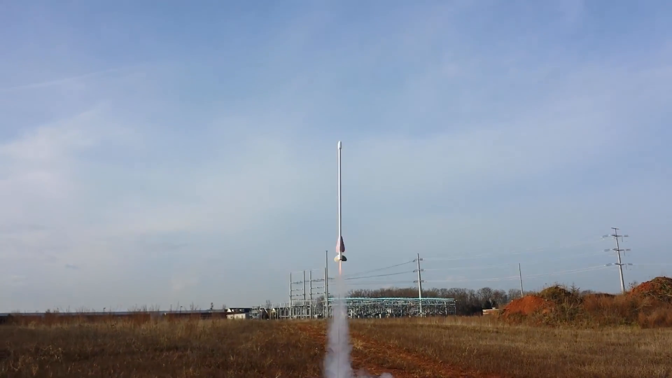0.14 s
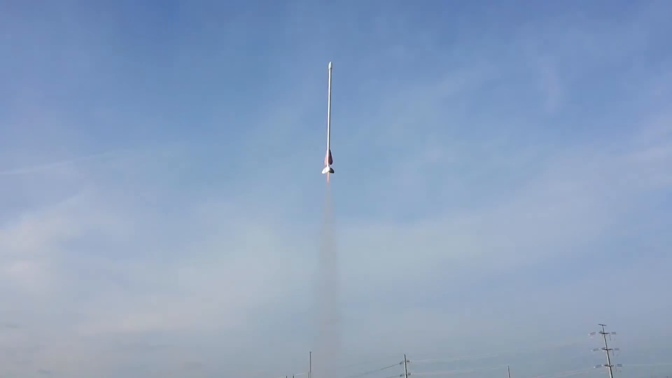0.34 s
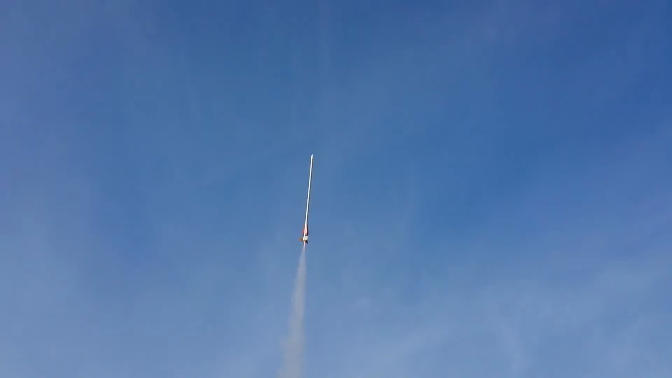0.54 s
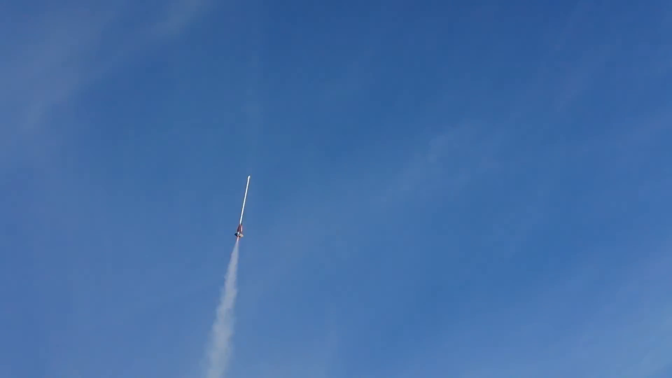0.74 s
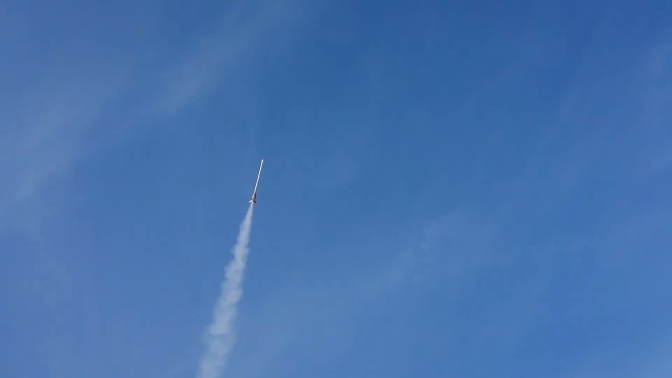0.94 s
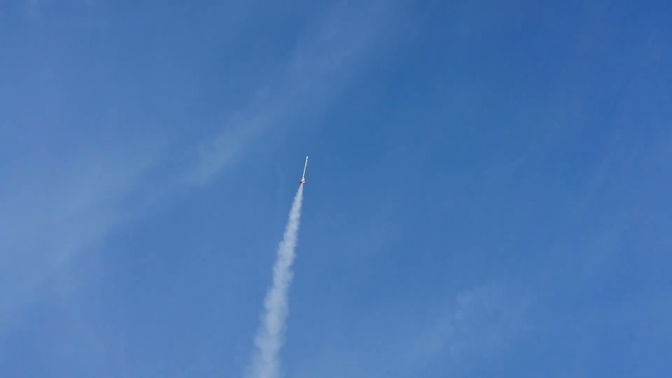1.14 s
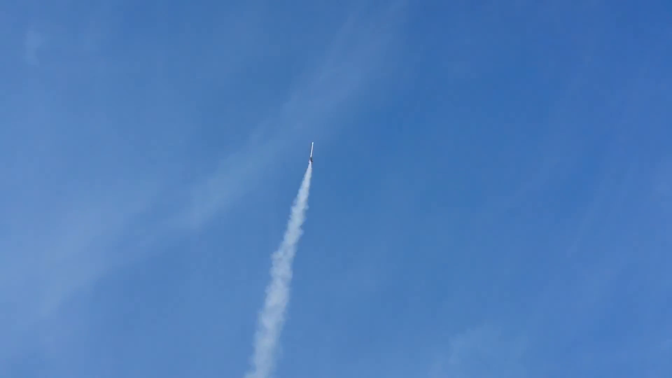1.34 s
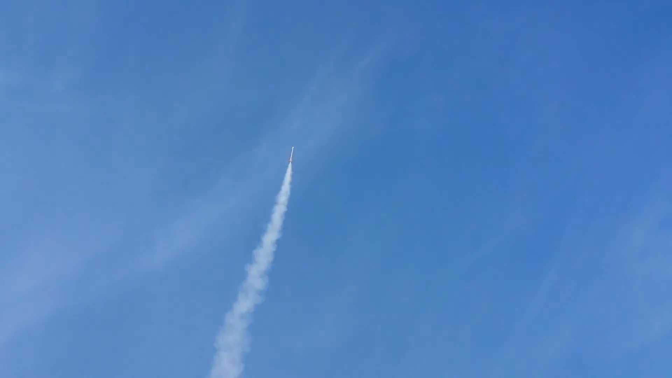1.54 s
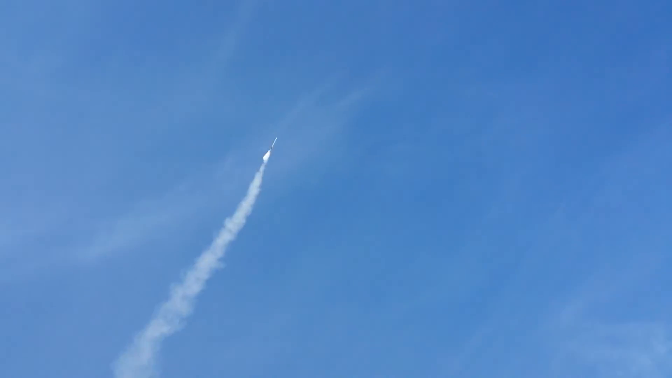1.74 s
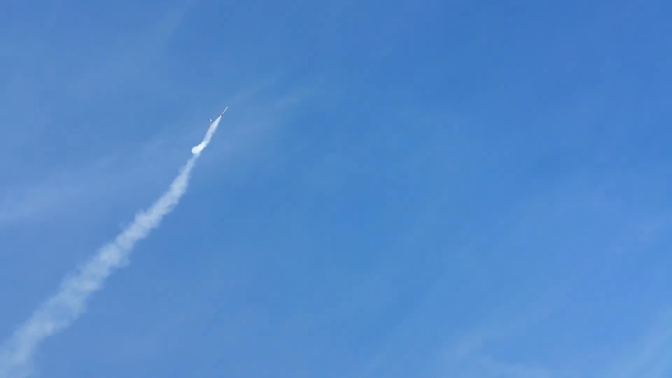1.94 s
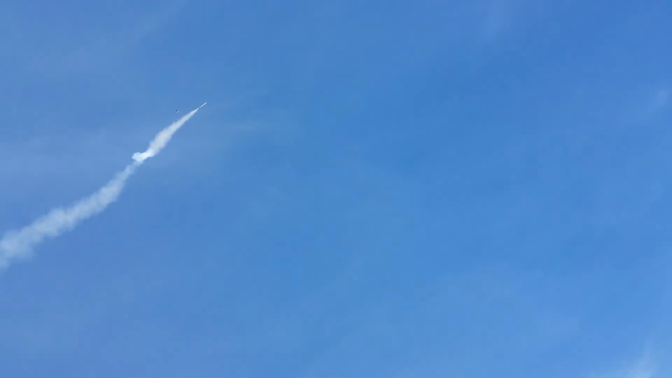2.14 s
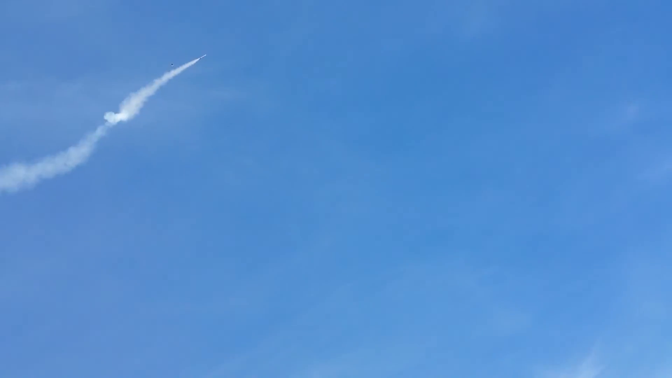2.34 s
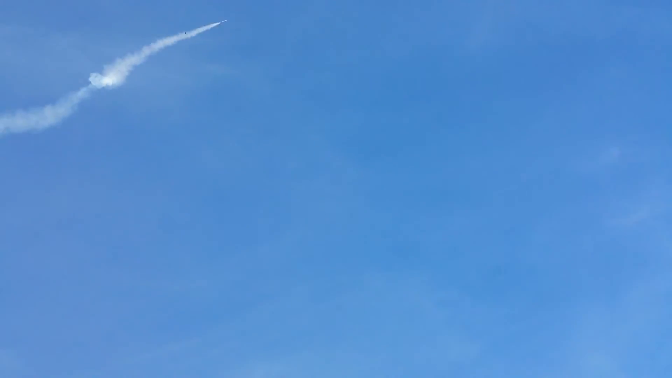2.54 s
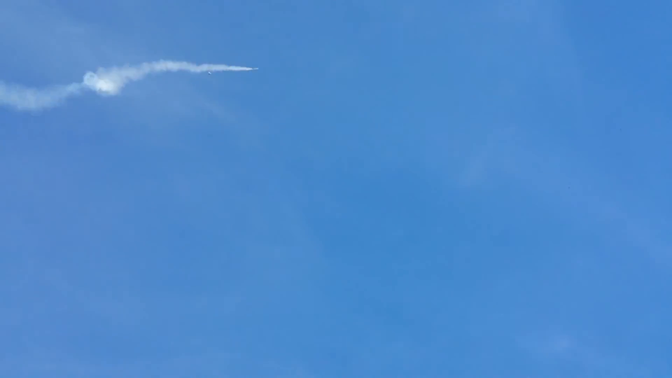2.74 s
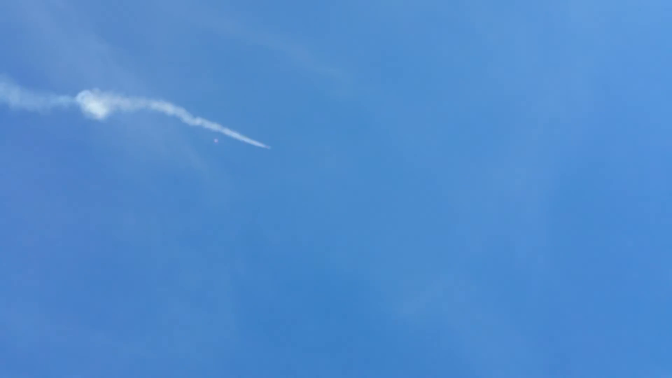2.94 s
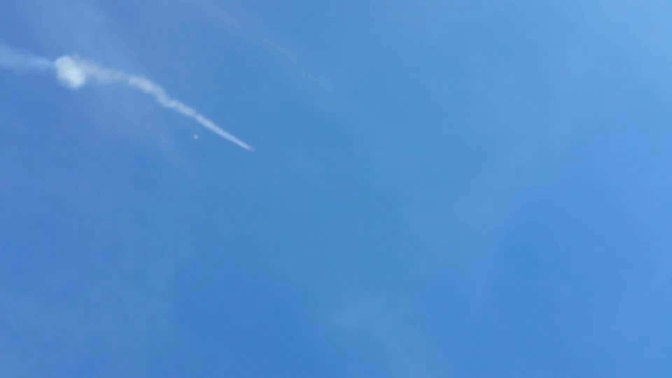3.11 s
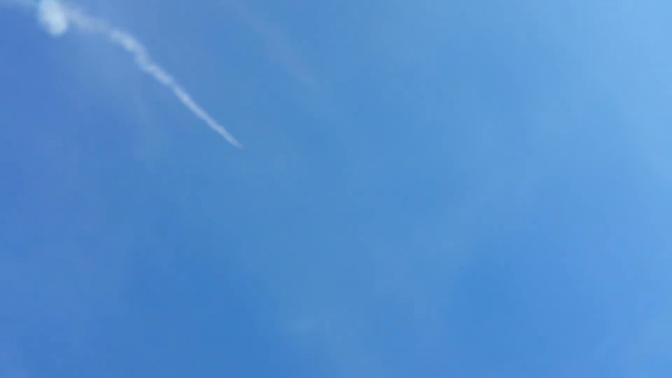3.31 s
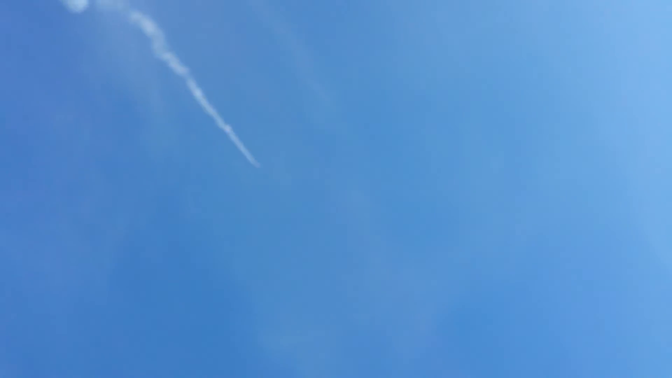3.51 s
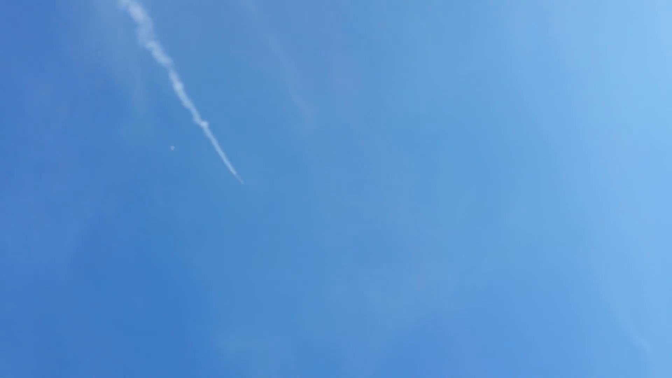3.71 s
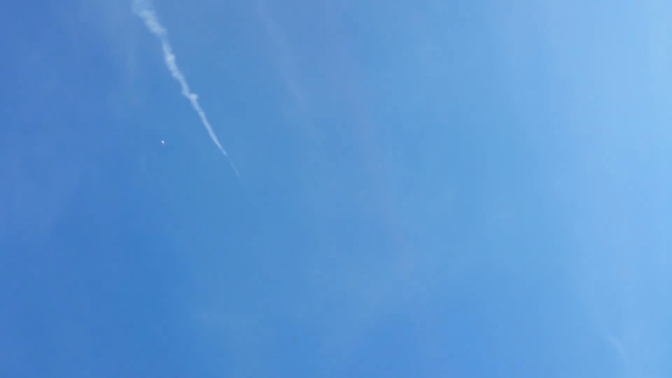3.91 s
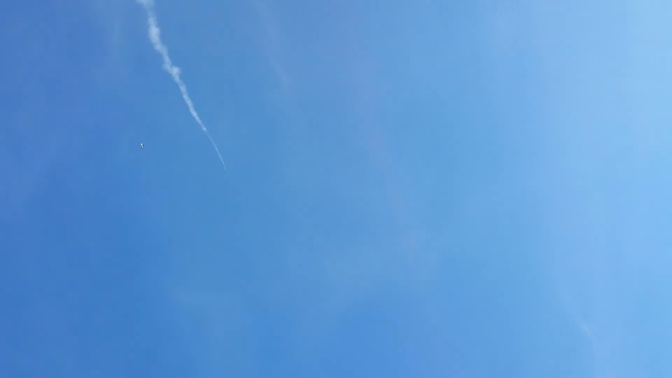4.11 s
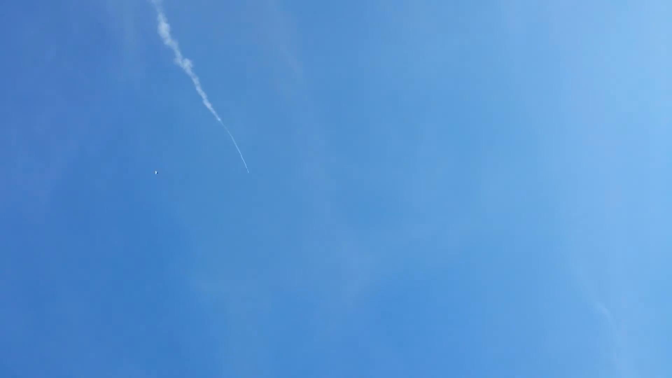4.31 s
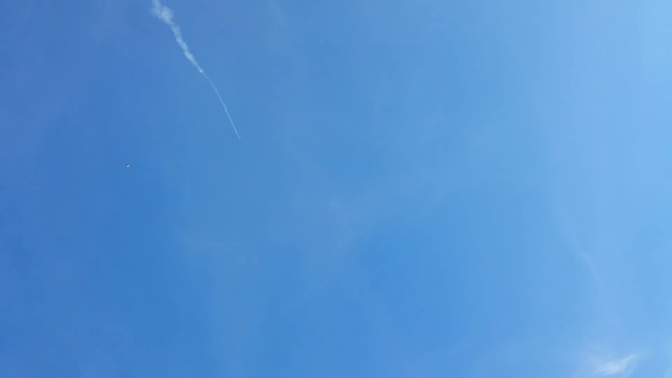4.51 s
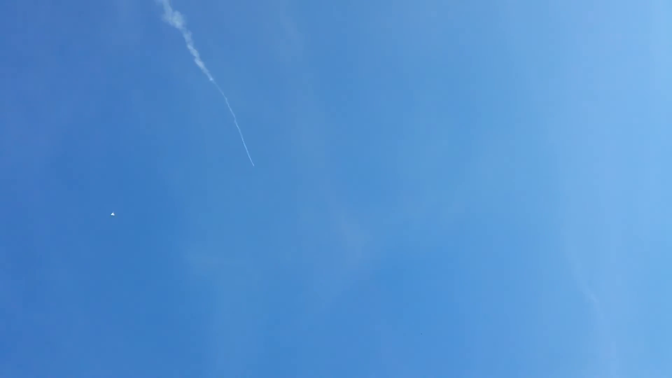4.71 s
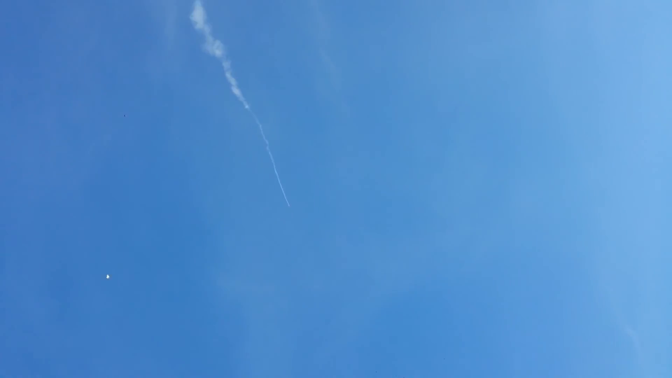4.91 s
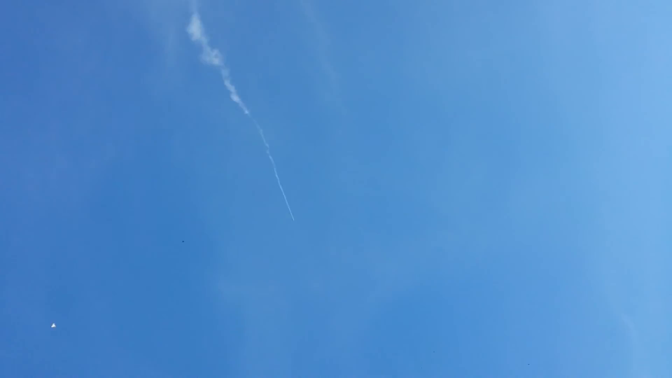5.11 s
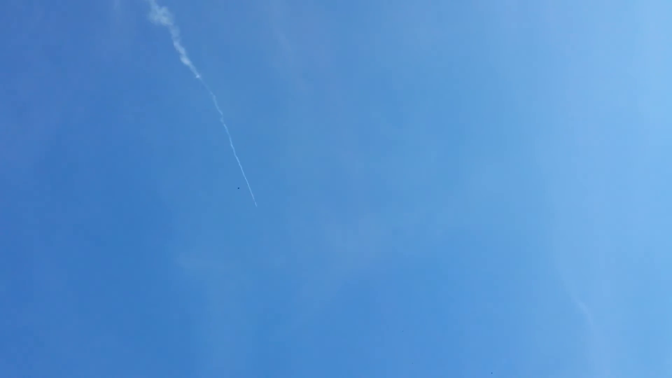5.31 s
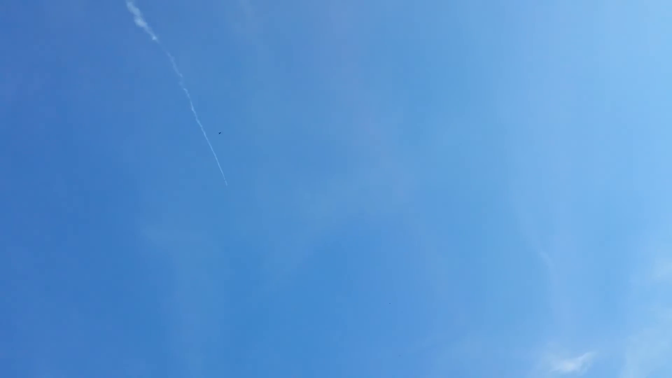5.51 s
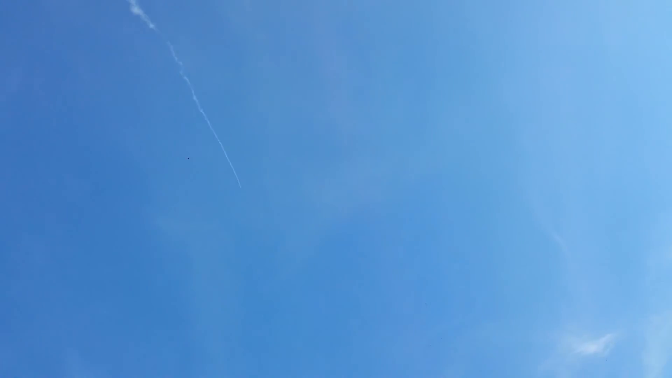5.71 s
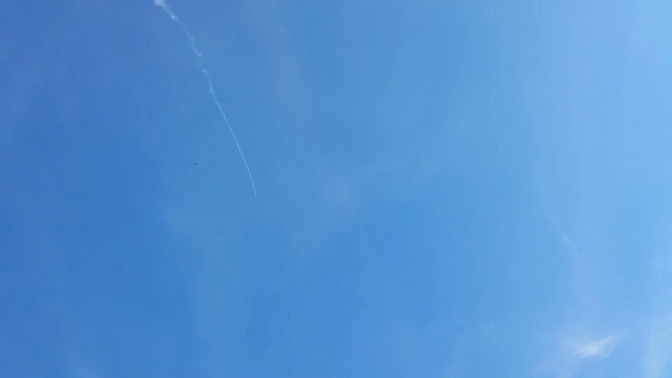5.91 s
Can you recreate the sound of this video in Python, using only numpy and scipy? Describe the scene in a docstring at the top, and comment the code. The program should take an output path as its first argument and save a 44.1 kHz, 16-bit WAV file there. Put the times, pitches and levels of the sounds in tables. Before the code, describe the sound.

A small rocket ignites right at the start with a sudden, loud rushing hiss, and its exhaust thumps against the hand-held stereo microphone for the first 0.2 seconds. The bright, fluttering hiss carries a lighter roar and a slight sweeping colour as the rocket climbs above an open field. Fine crackle runs through it, with sharper pops from about 0.8 seconds, the strongest near 1.4. At 1.8 seconds the first motor cuts out. After a brief gap, the second stage lights at about 2.05 seconds with a short, deeper roar, then hisses and pops on, slowly losing its brightness. It burns out just before 4 seconds with a few more pops, and a faint echo fades by about 4.7. A quiet, low outdoor rumble from the left and a very faint high whine remain until the end near 6 seconds, with one soft, distant puff at 5.3.

```python
"""Two-stage rocket launch

A small rocket lifts off from an open field near a hand-held stereo microphone. Each motor's turbulent
jet hisses and roars, spitting burning grains that pop; a short gap falls between the stages. Exhaust
wind buffets the microphone at lift-off, and the grass reflects the sound with a growing delay.
After burnout a low outdoor rumble from the left, a faint whine and one distant puff remain."""
import sys
import numpy as np
from scipy import signal
from scipy.io import wavfile
from scipy.ndimage import uniform_filter1d

SR = 44100
rng = np.random.default_rng(int(sys.argv[2]) if len(sys.argv) > 2 else 0)


def waveform_to_disk(signal):
    """Save audio, clipped to [-1, 1], as 16-bit WAV at the path in sys.argv[1]."""
    frames = np.transpose(np.atleast_2d(signal))
    scaled = np.clip(frames, -1, 1) * 32767
    samples = np.round(scaled).astype(np.int16)
    wavfile.write(sys.argv[1], SR, samples)


N = 262501
T = np.arange(N) / SR
SIZE, HOP = 512, 128  # short-time spectra, in samples
BIN_HZ = np.fft.rfftfreq(SIZE, 1 / SR)[:, None]
FRAME_S = np.arange(N // HOP + 2) * HOP / SR


def gain_of(db):
    """Amplitude ratio: tenfold for every 20 dB."""
    return 10 ** (np.asarray(db) / 20)


def unit_rms(x):
    """Normalisation to a mean square of 1."""
    return x / np.sqrt(np.mean(abs(x) ** 2) + 1e-20)


def at_time(points, t):
    """Linear interpolation in time."""
    return np.interp(t, *np.transpose(points))


def at_frequency(points, hz):
    """Interpolation on a logarithmic frequency axis."""
    f, value = np.transpose(points)
    return np.interp(np.log(hz + 1), np.log(f + 1), value)


def coherent_noise(coherence, hz, frames):
    """Partial coherence: the left and right noise spectra share a common part."""
    a, b, c, d = rng.standard_normal((frames, len(hz), 4)).T
    common, separate = a + 1j * b, c + 1j * d
    coherence = np.clip(coherence, 0, 1)
    return np.array([common, coherence * common + np.sqrt(1 - coherence ** 2) * separate])


HOLLOW_HZ, HOLLOW_Q = 1620, 4.5  # the lower of two cavities at the left port
def cavity(f, resonance_hz, q, share):
    """Interference of a resonator with the direct path: a peak, then a dip where they cancel."""
    ratio = f / resonance_hz
    both = 1 - share + share / (1 - ratio ** 2 + 1j * ratio / q)
    return both / abs(both) * np.hypot(abs(both), .35)  # scattered sound fills the dip


# Left-right difference due to the microphone casing: f/Hz, level/dB
CASING_BALANCE = [(200, -0.5), (900, -0.5), (2700, 0.5), (5000, -2.1), (9000, 4.5), (11000, 0.5),
                  (13000, 6.5), (15000, 2.5)]
def casing_db(hz):
    """Level difference: the casing colours the two ports unequally."""
    return at_frequency(CASING_BALANCE, hz)


# Rumble spectrum: f/Hz, relative level/dB
RUMBLE_SPECTRUM = [(15, -46), (25, -17), (43, -7.5), (93, 0), (260, -9), (297, -10.5), (330, -16),
                   (429, -20.5), (727, -12), (1260, -14.5), (1560, -18), (3010, -32), (6460, -35),
                   (11200, -40.5), (13500, -49)]
# Likeness of the rumble at the two ports: f/Hz, coherence
RUMBLE_COHERENCE = [(100, 1), (500, 0.93), (2000, 0.39), (3500, 0.39), (6000, 0.066), (15000, .05)]
# Whine tones before panning: f/Hz, level/dB relative to the rumble
WHINE_TONES = [(10002, -43), (14002, -32)]
# Background, low during the first burn, then rising: t/s, level/dB
BACKGROUND_LEVEL = [(0, -53.5), (.7, -47.5), (1.05, -55), (2.1, -53.5), (2.8, -48.5), (4.05, -36.5),
                    (5.95, -37)]
def background():
    """Ambient noise with a faint whine; a difference in arrival time puts the rumble on the left."""
    hz, frames = np.fft.rfftfreq(1024, 1 / SR)[:, None], N // 256 + 3
    swell = unit_rms(uniform_filter1d(uniform_filter1d(rng.standard_normal(frames), size=8), size=8))
    depth_db = -1.14 + 3.7 * np.exp(-(hz / 350) ** 2)  # the bass fluctuates most
    spectra = coherent_noise(at_frequency(RUMBLE_COHERENCE, hz), hz, frames)
    spectra *= gain_of(at_frequency(RUMBLE_SPECTRUM, hz) + swell * depth_db)
    cavities = cavity(hz, 6360, q=3.7, share=.49) * cavity(hz, HOLLOW_HZ, HOLLOW_Q, share=.028)
    spectra[0] *= abs(cavities) * gain_of(casing_db(hz))
    spectra[1] *= np.exp(-2j * np.pi * hz * 18 / SR)  # the right port lags 18 samples
    rumble = unit_rms(signal.istft(spectra, nperseg=1024, noverlap=768)[1][:, :N])
    whine = sum(gain_of(db) * np.sin(2 * np.pi * f * T) for f, db in WHINE_TONES)
    return gain_of(at_time(BACKGROUND_LEVEL, T)) * (rumble + whine * gain_of([[-9], [3]]))


def distant_puff(start_s=5.28, db=-41, hz=780, t60_s=.1):
    """Exponential decay of a distant charge: a burst of mid-band noise over a thin hiss."""
    age = T - start_s
    burst = rng.standard_normal(N) + .64 * rng.standard_normal((2, N))
    band = signal.sosfilt(signal.butter(2, [hz / 1.6, hz * 1.9], "band", fs=SR, output="sos"), burst)
    hiss = signal.lfilter(*signal.butter(2, 8000, fs=SR), burst)
    envelope = np.clip(age / .016, 0, 1) * gain_of(db - 60 * np.maximum(age - .032, 0) / t60_s)
    return (unit_rms(band) + .25 * hiss) * envelope


def pressure_pulses(events, pan_db):
    """Transients as Gaussian wave packets; positive pan is to the left."""
    out, t = np.zeros((2, N + SIZE * 4)), np.arange(-SIZE * 2, SIZE * 2) / SR
    for time_s, db, hz, cycles in events:
        pulse = np.cos(2 * np.pi * hz * t) * np.exp(-(t * hz / cycles) ** 2)
        window = np.exp(-(t * hz) ** 2)
        pulse -= pulse.sum() / window.sum() * window  # no net push
        at = round(time_s * SR)
        out[:, at:at + len(t)] += gain_of([[db + pan_db / 2], [db - pan_db / 2]]) * pulse
    return out[:, SIZE * 2:SIZE * 2 + N]


# Hard gusts of exhaust: t/s, level/dB
EXHAUST_GUSTS = [(0.05, -24), (.072, -18), (0.089, -21.5), (.104, -25.5), (.113, -29.5), (.120, -15)]
def exhaust_wind(start_s=.022, attack_s=.015, hold_s=.085, release_s=.04):
    """Turbulent pressure buffets each port independently; a few hard gusts strike both."""
    wind = signal.sosfilt(signal.butter(1, [45, 450], "band", fs=SR, output="sos"),
                          rng.standard_normal((2, N)))
    envelope = np.interp(T, np.cumsum([start_s, attack_s, hold_s, release_s]), [0, 1, 1, 0]) ** 2
    gust_hz, cycles = 144, .18
    gusts = pressure_pulses([(s, db, gust_hz, cycles) for s, db in EXHAUST_GUSTS], pan_db=9)
    return unit_rms(wind) * envelope * gain_of([[-22.5], [-28.5]]) + gusts


PAD_DISTANCE_M, MIC_HEIGHT_M, NOZZLE_HEIGHT_M = 15, 2.075, 1.5
CLIMB_M_S, ACCELERATION_M_S2, SOUND_M_S = 8.4, 23.4, 343
def with_ground_reflection(direct):
    """Image source: the grass adds a weaker, duller copy, later the higher the rocket climbs."""
    dull = signal.lfilter(*signal.butter(1, 3000, fs=SR), direct)
    height = NOZZLE_HEIGHT_M + CLIMB_M_S * T + ACCELERATION_M_S2 / 2 * T ** 2
    delay = 2 * MIC_HEIGHT_M * height / np.hypot(PAD_DISTANCE_M, height) / SOUND_M_S
    return direct + .52 * np.array([np.interp(T - delay, T, channel) for channel in dull])


# Jet noise from ignition to burnout, one curve per motor: t/s, level/dB
BURN_LEVELS = [
    [(0, -18.5), (.012, -11.5), (.03, -8.5), (.052, -5.5), (.138, -7.5), (.184, -13), (.212, -11),
     (.262, -14.5), (.36, -13), (.594, -7.5), (.75, -10.5), (1.04, -14.5), (1.474, -17), (1.55, -18.5),
     (1.67, -17.5), (1.785, -19.5)],
    [(2.03, -19.5), (2.09, -17.5), (2.55, -21.5), (2.75, -19.5), (2.95, -22.5), (3.17, -19.5),
     (3.29, -21.5), (3.33, -20), (3.56, -18), (3.74, -18), (3.81, -16), (3.94, -16.5)],
]
# End of each burn: cut-off rate/(dB/s), relative echo level/dB, echo decay/(dB/s)
BURN_ENDINGS = [(440, -16.5, 107), (232, -16, 47)]
IGNITION_DB_PER_S, FAR_ECHO_DB, FAR_ECHO_HOLD_S = 314, -32.5, .57
def burn_db(t):
    """Incoherent sounds add in power: two burns, each leaving a near and a far echo."""
    power = 1e-12
    for curve, (cut_rate, echo_db, echo_rate) in zip(BURN_LEVELS, BURN_ENDINGS):
        before, after = np.maximum(curve[0][0] - t, 0), np.maximum(t - curve[-1][0], 0)
        burn = gain_of(at_time(curve, t) - IGNITION_DB_PER_S * before)
        cutoff = gain_of(-cut_rate * after)
        near_echo = gain_of(echo_db - echo_rate * after)
        far_echo = gain_of(FAR_ECHO_DB - cut_rate * np.maximum(after - FAR_ECHO_HOLD_S, 0))
        power += burn ** 2 * (cutoff ** 2 + (after > 0) * (near_echo ** 2 + far_echo ** 2))
    return 10 * np.log10(power)


# Roar relative to hiss: t/s, level/dB
ROAR_BALANCE = [(0, -9.5), (.05, -24), (.14, -14), (.3, -14), (.55, -22), (1.05, -16.5), (1.5, -11.5),
                (1.8, -12), (1.85, -16.5), (3.9, -15.5), (4.0, -11.5), (4.7, -31)]
def roar_balance_db(t):
    """Spectral balance of the jet, before surge and flutter."""
    return at_time(ROAR_BALANCE, t)


def crackle(count=300, span_s=4.1, cycles=.49):
    """Shot noise: small pops at random times, their level following the roar."""
    when, weakness, pitch = rng.random((count, 3)).T
    times = span_s * when
    db = burn_db(times) + roar_balance_db(times) - 2.18 * np.log(.03 + weakness)
    return pressure_pulses(zip(times, db, 600 + 1200 * pitch, np.full(count, cycles)), pan_db=-1.5)


# The loudest pops: t/s, level/dB, f/Hz, half-width/cycles
GRAIN_POPS = [(.792, -21, 750, 0.5), (.798, -20, 520, 0.3), (.805, -23, 700, 0.5), (.978, -17, 930, .28),
              (1.009, -25, 650, 0.28), (1.264, -29, 1030, 0.73), (1.3657, -10, 1040, .32),
              (1.408, -17, 1100, 0.3), (1.678, -16.5, 1000, 0.2), (1.701, -17.5, 800, .3),
              (1.714, -16, 1210, 0.3), (1.789, -16, 960, 0.25), (1.796, -20, 800, 0.3),
              (2.201, -15, 1200, 0.41), (2.835, -19, 1210, 0.4), (3.081, -17, 1390, 0.17),
              (3.597, -19, 755, .56), (3.9334, -13, 1270, 0.73), (3.951, -26, 900, 0.98),
              (3.965, -18, 1050, 0.41), (4.0745, -22.5, 1400, 0.48), (4.184, -32, 1150, 0.79)]
def grain_pops():
    """Impulsive sources: each burning grain spat from the nozzle radiates one pulse."""
    return pressure_pulses(GRAIN_POPS, pan_db=-1.5)


# Left port as the microphone follows the rocket:
# t/s, cavity f/Hz, Q, cavity share, hollow share, left-right level/dB, lag/samples
PORT_AIM = [(0, 6270, 13, 0.4, 0.2, 1.5, 0.69), (.06, 6340, 9, 0.43, .15, 1, .55),
            (.145, 6540, 13.5, 0.22, 0, -1.5, 1.1), (.2, 6900, 4.5, 0.17, 0.18, 2, 0.72),
            (.6, 6860, 3.3, 0.5, 0.22, 4.5, 1.26), (.95, 6300, 10.7, 0.24, 0.26, 1.5, 3.82),
            (1.4, 6340, 9, 0.33, 0.16, 0, 0.76), (1.8, 6200, 9.5, 0.37, 0.18, -.5, 2.56),
            (2.1, 6400, 4.2, .4, 0, -0.5, 5.17), (2.35, 7150, 2.5, 0.45, 0.4, 2.5, 4.6),
            (2.7, 6730, 6.3, 0.57, .26, 1, 3.65), (3.099, 6700, 12, .38, 0.3, 1, 3),
            (3.5, 6580, 11, .58, 0.29, 0, 2.9), (3.95, 6580, 7.8, 0.46, .25, 1, 3.37),
            (4.3, 6600, 7.2, 0.41, .4, 4, 3.6)]
PAD_LEAD_RAD, FLIGHT_LEAD_RAD, LIFT_OFF_S = 1.65, .68, .15
def port_response():
    """Directional response: resonance, level and phase at the two ports vary with the aim."""
    times, *columns = np.transpose(PORT_AIM)
    hz, q, share, hollow_share, pan_db, lag = (np.interp(FRAME_S, times, c) for c in columns)
    cavities = cavity(BIN_HZ, hz, q, share) * cavity(BIN_HZ, HOLLOW_HZ, HOLLOW_Q, hollow_share)
    on_pad = np.clip((LIFT_OFF_S - FRAME_S) / .032 + .5, 0, 1)
    lead = FLIGHT_LEAD_RAD + (PAD_LEAD_RAD - FLIGHT_LEAD_RAD) * on_pad  # the casing turns the treble
    phase = lead * np.tanh(BIN_HZ / 3000) - 2 * np.pi * BIN_HZ * lag / SR
    casing = gain_of((casing_db(BIN_HZ) + pan_db) / 2)
    return np.array([cavities * np.exp(1j * phase) * casing, 1 / casing])


def flutter(frames, bins):
    """Random modulation of the flame, correlated over patches of time and frequency."""
    noise = rng.standard_normal((len(FRAME_S), len(BIN_HZ))).T
    return unit_rms(uniform_filter1d(uniform_filter1d(noise, frames, axis=1), bins, axis=0))


def surge_db(start_s=2.05, length_s=.15):
    """Low-frequency emphasis: the upper stage lights with a fuller flame and a deeper, louder roar."""
    gate = np.clip(np.minimum(FRAME_S - start_s, start_s + length_s - FRAME_S) / .025 + .5, 0, 1)
    return gate * (7 + 5.8 * np.exp(-(BIN_HZ / 800) ** 2))


# Spectrum of the hiss: f/Hz, relative level/dB
HISS_SPECTRUM = [(1200, -37.5), (2200, -15.5), (3500, -8), (5200, -6.5), (6800, -5.5), (8300, -0.5),
                 (10500, -5), (12500, -9.5), (14000, -15.5), (15300, -25)]
# Spectrum of the roar: f/Hz, relative level/dB
ROAR_SPECTRUM = [(60, -46.5), (150, -29), (400, -14), (900, -3), (1700, 2.5), (2500, 3.5), (4500, -18)]
# Band near 4 kHz within the hiss: t/s, relative level/dB
HISS_BODY = [(0, -12), (.07, -6), (.14, 0), (.6, -5), (1.0, -0.5), (2.1, 1.5), (2.3, -2), (3.0, 2.5),
             (3.9, .5)]
# Treble loss at 12 kHz, mostly growing as the rocket recedes: t/s, loss/dB
AIR_LOSS = [(0, -1), (.95, 3.5), (1.4, 9.5), (1.8, 1.5), (2.05, 2), (2.3, 7), (3.1, 7), (3.95, 11.5),
            (4.4, 11)]
# Likeness of the ports, lower as the microphone swings and in the echo: t/s, coherence
JET_COHERENCE = [(0, .8), (.3, .53), (.8, .55), (1.1, .7), (3.9, .73), (4.2, .4)]
def jet():
    """Turbulent mixing radiates hiss and roar; air absorbs the hiss as the square of frequency."""
    ports = port_response()
    body_db = at_time(HISS_BODY, FRAME_S) * np.exp(-((BIN_HZ - 3900) / 1500) ** 2)
    loss_db = at_time(AIR_LOSS, FRAME_S) * (BIN_HZ / 12000) ** 2
    hiss = abs(ports) * gain_of(at_frequency(HISS_SPECTRUM, BIN_HZ) + body_db - loss_db)
    roar = abs(ports) * gain_of(at_frequency(ROAR_SPECTRUM, BIN_HZ))
    hiss, roar = (z / np.sqrt((z ** 2).mean(axis=(0, 1))) for z in (hiss, roar))  # unit power per frame
    flicker = flutter(frames=3, bins=120)
    drift = flutter(frames=25, bins=12)
    sputter = flutter(frames=2, bins=30)
    hiss *= gain_of(.81 * flicker + drift)
    roar *= gain_of(roar_balance_db(FRAME_S) + surge_db() + .56 * sputter + flicker)
    coherence = at_time(JET_COHERENCE, FRAME_S)
    long_waves = .85 * np.exp(-(BIN_HZ / 1200) ** 2)  # these reach both ports alike
    noise = coherent_noise(coherence + (1 - coherence) * long_waves, BIN_HZ, len(FRAME_S))
    spectra = noise * ports / abs(ports) * np.hypot(hiss, roar)
    flame = unit_rms(signal.istft(spectra, nperseg=SIZE, noverlap=SIZE - HOP)[1][:, :N])
    return flame * gain_of(burn_db(T))


def scene():
    """Superposition of the rocket, its ground reflection, wind, background and puff."""
    rocket = jet() + crackle() + grain_pops()
    return with_ground_reflection(rocket) + exhaust_wind() + background() + distant_puff()


def record(dry):
    """Transduction: microphone self-noise, bass roll-off, peak clipping and a band limit."""
    noisy = dry + gain_of(-63) * rng.standard_normal(dry.shape)
    thin = signal.sosfilt(signal.butter(2, 45, "high", fs=SR, output="sos"), noisy)
    lowpass = signal.firwin(511, 15350, window=("kaiser", 9), fs=SR)[None]
    return signal.oaconvolve(np.clip(thin, -.97, .97), lowpass, "same")


dry = scene()
out = record(dry)
waveform_to_disk(out)
```